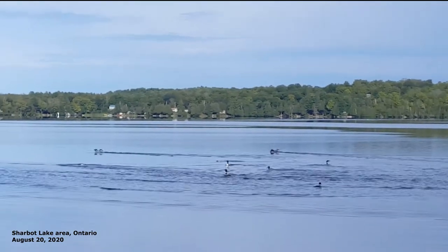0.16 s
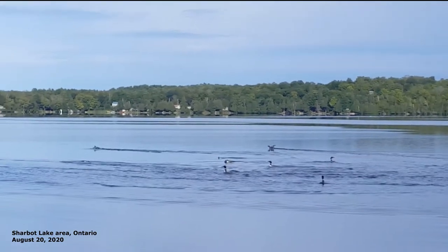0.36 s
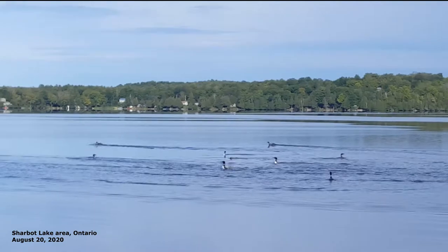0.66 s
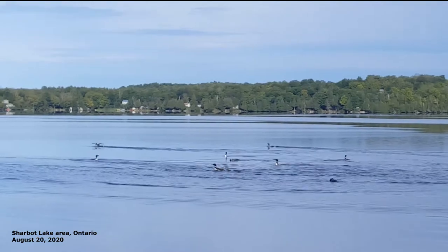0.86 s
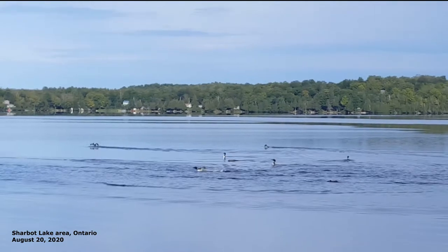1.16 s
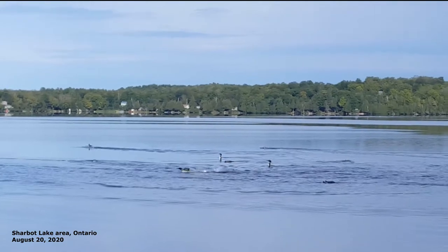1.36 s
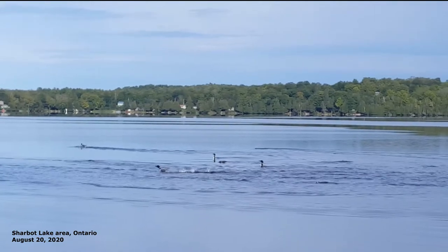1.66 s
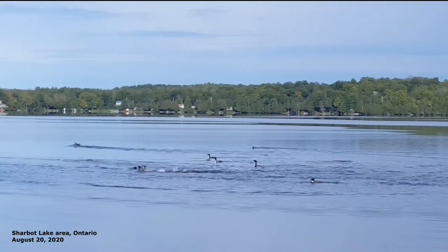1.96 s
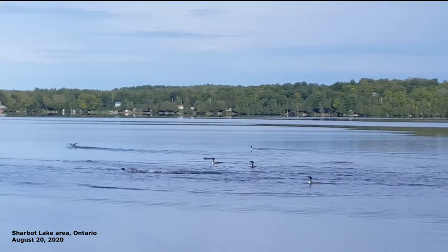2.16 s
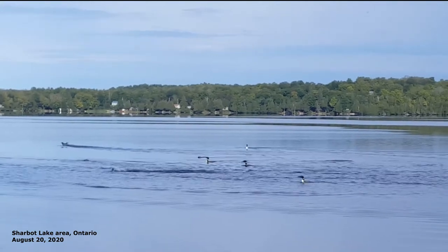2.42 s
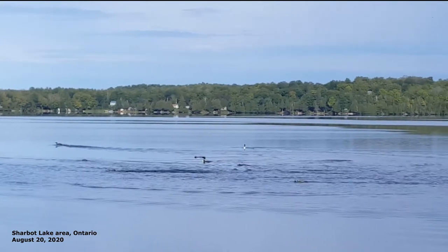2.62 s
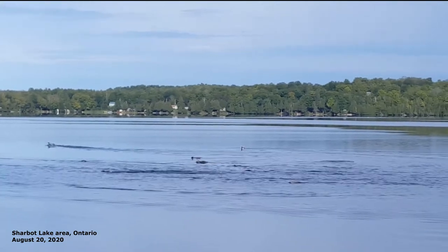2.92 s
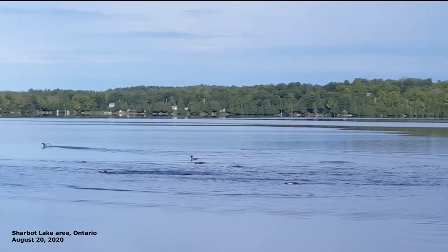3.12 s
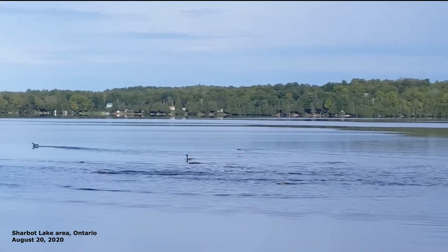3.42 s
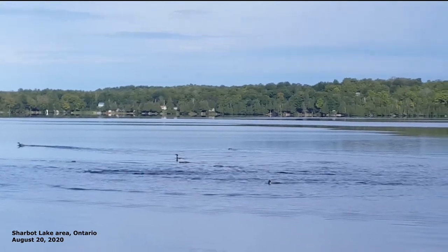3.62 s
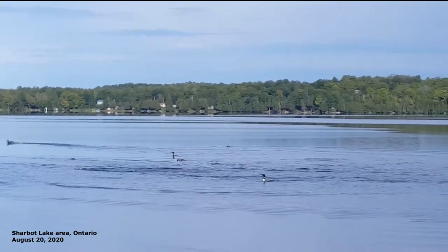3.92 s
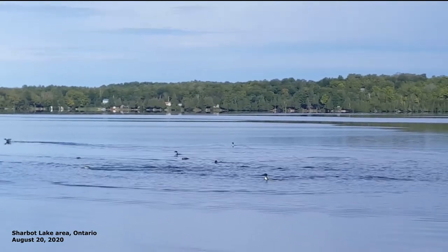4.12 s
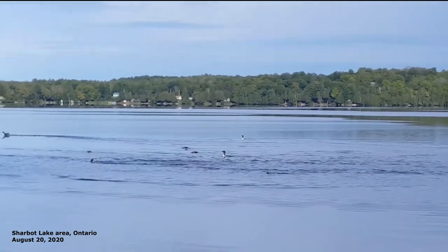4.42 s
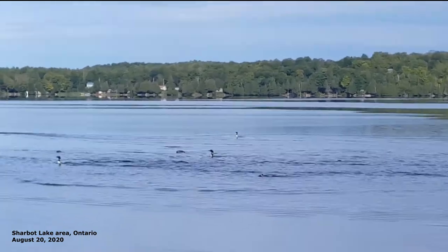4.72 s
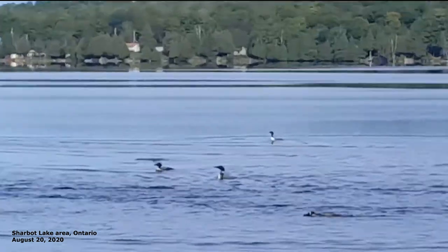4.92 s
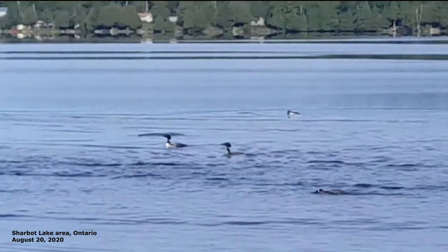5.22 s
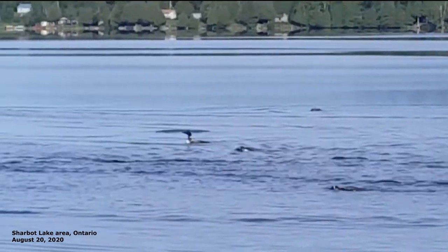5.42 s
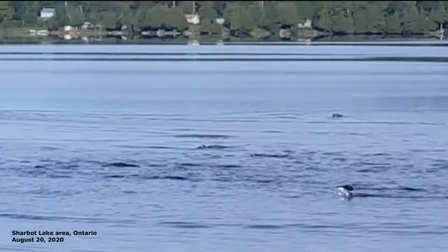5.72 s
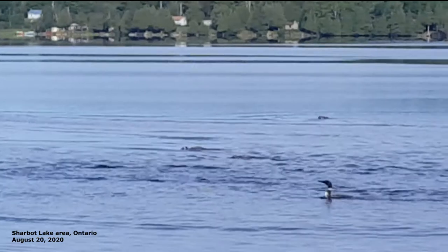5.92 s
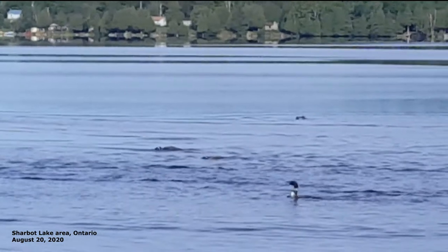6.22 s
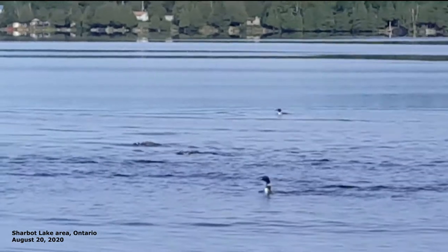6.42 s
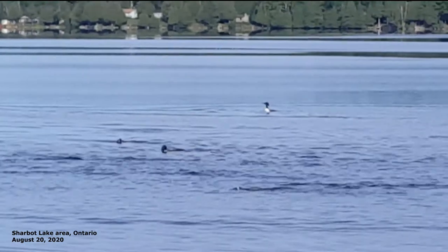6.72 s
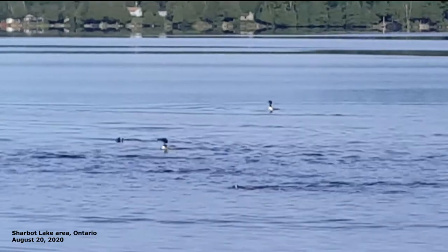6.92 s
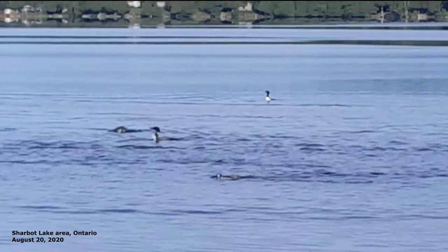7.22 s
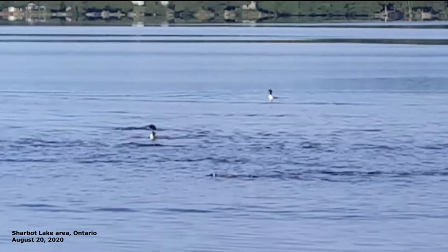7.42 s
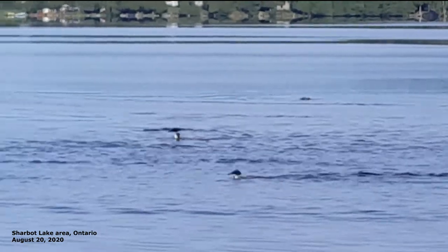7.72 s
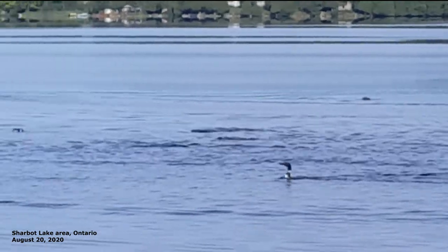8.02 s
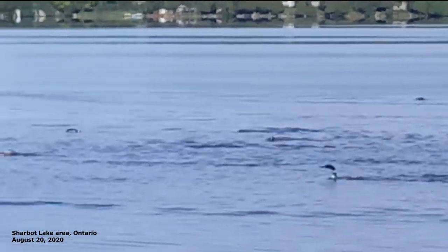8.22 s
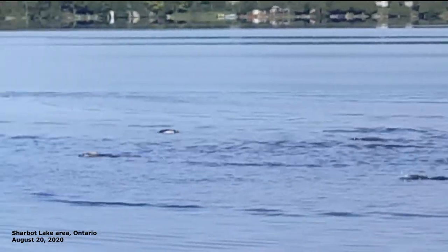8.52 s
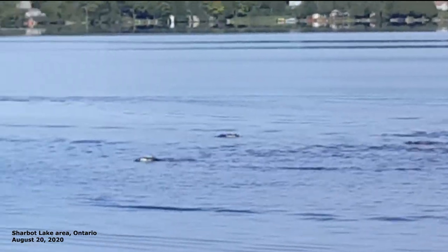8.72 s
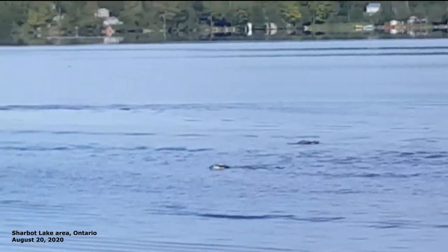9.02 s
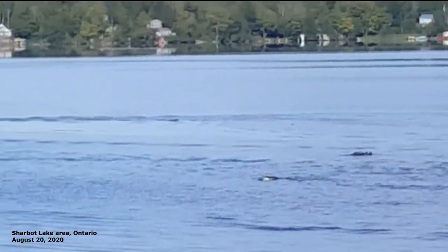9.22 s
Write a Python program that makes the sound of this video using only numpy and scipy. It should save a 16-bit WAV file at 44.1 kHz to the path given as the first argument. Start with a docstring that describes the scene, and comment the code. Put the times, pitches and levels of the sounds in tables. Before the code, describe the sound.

Outdoor stereo pickup beside a lake: loud, clear loon tremolos slightly left of centre, each a rapid yodelling flutter under a second long, crowd together and answer one another, with small yelps and hoots filling the gaps. Diffuse echoes trail behind. Beneath are quiet air and hiss, soft ripples, bubble-like plops, a thin insect buzz at left and a low sinking motor hum. Brief handling crackle occurs before the midpoint.

```python
"""Several diving waterbirds give overlapping tremolo calls on a calm lake: gliding whistles with
a few overtones and breath hiss. The wooded shore answers with scattered, decaying noise echoes.
An insect buzzes to the left as pulsed, ringing noise; a far engine drones past as a few sinking sines.
Water laps as swelling noise and plops as short rising sines. Something rubs and ticks against the left
microphone port as gritty noise and brief snaps, all over a steady bed of lake air and hiss."""
import sys
import numpy as np
from scipy import signal
from scipy.fft import rfft, irfft, next_fast_len
from scipy.io import wavfile
from scipy.ndimage import uniform_filter1d, map_coordinates

SR = 44100
rng = np.random.default_rng(int(sys.argv[2]) if len(sys.argv) > 2 else 0)


def linear_from_db(decibels):
    """Turn decibels (scalar or array-like) into linear amplitude factors; 0 gives 1."""
    return 10 ** (np.asarray(decibels, float) / 20)


def bounce(signal):
    """Save signal as a 16-bit WAV file at the path given by the first command-line argument."""
    frames = np.transpose(np.atleast_2d(signal))
    limited = np.clip(frames, -1, 1)
    pcm = np.round(limited * 32767).astype(np.int16)
    wavfile.write(sys.argv[1], SR, pcm)


N = 412769  # samples


def unit(x):
    """Scale to rms 1."""
    return x / np.sqrt(np.mean(x ** 2) + 1e-20)


def along(points, hz):
    """Read (Hz, value) points on a log frequency axis."""
    point_hz, values = np.transpose(points)
    return np.interp(np.log(hz + 1), np.log(point_hz + 1), values)


def curves(rows):
    """One value per sample for each column after the time."""
    seconds, *columns = np.transpose(rows)
    return [np.interp(np.arange(N) / SR, seconds, column) for column in columns]


def wobble(rate):
    """A smooth random curve with rate knots a second."""
    knots = rng.standard_normal(int(N * rate / SR) + 4)
    return map_coordinates(knots, [np.arange(N) * rate / SR])


def filtered(x, response):
    """Multiply the spectrum of x by a response of frequency."""
    size = next_fast_len(N + SR // 2)
    return irfft(rfft(x, size) * response(np.fft.rfftfreq(size, 1 / SR)), size)[..., :N]


def add(track, start, sound):
    """Mix a sound into a track from the start time in seconds."""
    part = track[round(start * SR):][:len(sound)]
    part += sound[:len(part)]


# Stereo likeness of the noises. Each row: frequency in Hz, left-right correlation (0-1).
STEREO_LIKENESS = [(40, 0.98), (300, 0.8), (700, 0.64), (1600, 0.22), (15000, 0)]
# Stereo balance of the noises. Each row: frequency in Hz, left over right in dB.
STEREO_LEAN = [(60, 1.5), (640, 2.5), (3100, 5), (6000, 8.5), (15000, -2)]


def pair(spectrum):
    """Stereo noise of rms 1: mid and side shares set the likeness, then a tilt per frequency pans it."""
    def mid_and_side(hz):
        angle = np.arccos(np.clip(along(STEREO_LIKENESS, hz), -1, 1)) / 2
        return linear_from_db(along(spectrum, hz)) * [np.cos(angle), np.sin(angle)]

    def balance(hz):
        return linear_from_db(along(STEREO_LEAN, hz) * [[.5], [-.5]])

    mid, side = filtered(rng.standard_normal((2, N)), mid_and_side)
    return unit(filtered(np.array([mid + side, mid - side]), balance))


# Upper overtones. Each row: multiple of the pitch, level in dB added to the flash level of the crest.
UPPER_OVERTONES = [(3, -7.5), (4, -6), (5, -12.5), (6, -16.5), (7, -25.5), (8, -40.5)]
CHEST_THIRD_DB = -21  # third harmonic of the lowest notes, relative to their octave
OCTAVE_DIPS = .5  # extra dB that the head-voice octave loses per dB of dip


def phrase(start, end, octave_db, rows):
    """A whistle that swings between round crests and sharper troughs (s, Hz, dB), heard from start to end."""
    seconds, hz, db = np.transpose(rows)
    t = start + np.arange(int((end - start) * SR)) / SR
    place = np.interp(t, seconds, np.arange(len(seconds)))
    last_leg = len(seconds) - 2
    leg = np.minimum(place.astype(int), last_leg)
    turn = np.pi * (place - leg)
    middle_or_last = np.where(leg == last_leg, 1 - np.cos(turn / 2), (1 - np.cos(turn)) / 2)
    ease = np.where(leg == 0, np.sin(turn / 2), middle_or_last)
    # the power rounds the crests and sharpens the troughs
    rising = np.diff(hz)[leg] > 0
    ease = np.where(rising, 1 - np.abs(1 - ease) ** 1.25, ease ** 1.25)
    pitch, level = (v[leg] + np.diff(v)[leg] * ease for v in (hz, db))
    phase = 2 * np.pi * (np.cumsum(pitch) / SR + rng.random())
    dip_db = level - db.max()

    head_db = min(octave_db, -20 if hz[1:3].max() < 1020 else -8)  # the head voice is nearly pure
    flash_db = min(head_db, -24) + 1.3 * dip_db  # upper overtones flash on the loud crests
    chest = np.clip((1010 - pitch) / 90, 0, 1)  # 1 = low voice, which takes the octave level as listed
    octave_level = chest * octave_db + (1 - chest) * (head_db + OCTAVE_DIPS * dip_db)
    tone = np.sin(phase) + linear_from_db(octave_level) * np.sin(2 * phase)
    tone += (hz[1] < 830) * chest * linear_from_db(octave_db + CHEST_THIRD_DB) * np.sin(3 * phase)
    tone += sum(linear_from_db(flash_db + under) * np.sin(k * phase) for k, under in UPPER_OVERTONES)
    edges = np.clip(np.minimum(t - start, end - t) / .017, 0, 1)  # 17 ms fades
    return np.sqrt(2) * linear_from_db(level) * edges * tone


WAVER_PER_S = 11  # usual crests a second
DRAWN_OUT = .4  # a slow first rise or last fall reaches lower: power of its length
HELD_AFTER = 1.6  # the last fall lasts at most this many half wavers, then the low pitch is held
# Trough pitch. Each row: crest pitch in Hz, share of the pitch lost in a trough of usual depth (0-1).
TROUGH_PITCH_DROP = [(1050, 0.2272), (1250, 0.2162), (1400, 0.234), (1490, 0.1148)]
# Trough level. Each row: crest pitch in Hz, level lost in a trough of usual depth in dB.
TROUGH_LEVEL_DIP = [(1050, 8.6), (1250, 7.6), (1400, 12), (1490, 17.2)]


def tremolo(start, first, last, end, first_hz, last_hz, first_db, last_db, octave_db, depth=1):
    """Evenly spaced crests with troughs between; pitch and level glide from the first crest to the last."""
    count = max(round((last - first) * WAVER_PER_S), 1)
    half = (last - first) / count / 2
    mean_hz = (first_hz + last_hz) / 2
    s = first + half * np.arange(-1, 2 * count + 3)
    s[0] = min(s[0], 0)
    s[-2] = last + np.clip(end - last, half, HELD_AFTER * half)
    s[-1] = max(s[-2], end) + half
    trough = 1. - np.arange(len(s)) % 2  # 0 at a crest, 1 in a trough
    trough[0], trough[-2:] = (np.array([first - s[0], s[-2] - last]) / half) ** DRAWN_OUT
    crest_hz = np.interp(s, [first, last], [first_hz, last_hz])
    crest_db = np.interp(s, [first, last], [first_db, last_db])
    hz = crest_hz * (1 - depth * along(TROUGH_PITCH_DROP, mean_hz) * trough)
    db = crest_db - depth * along(TROUGH_LEVEL_DIP, mean_hz) * trough
    return start, start + end, octave_db, np.transpose([start + s, hz, db])


# A note's rise to its crest: length, starting share of the pitch, starting level; then its final level (re crest).
RISE_S, RISE_FROM, RISE_DB, FADE_DB = .04, .84, -6, -3.5
# A long note that leaps up sags first: time after the crest, share of the pitch, level; then its final level.
SAG_S, SAG_TO, SAG_DB, LEAP_DB = 0.034, .92, -3.5, 7


def note(crest, end, hz, db, end_hz, octave_db):
    """One rise to a crest, then a glide to the end pitch, by way of a sag if it leaps."""
    leaps = end - crest > .055 and end_hz > hz
    sag = [(crest + SAG_S, SAG_TO * hz, db + SAG_DB)] if leaps else []
    start = crest - RISE_S
    end_db = db + (LEAP_DB if leaps else FADE_DB)
    rows = [(start, RISE_FROM * hz, db + RISE_DB), (crest, hz, db), *sag, (end, end_hz, end_db)]
    return start, end, octave_db, rows


# Tremolo calls. Each row: start in seconds, then first crest, last crest and end in seconds after the start,
# first and last crest pitch in Hz, first and last crest level in dB before panning, octave overtone in dB
# re the fundamental (capped in the head voice), depth of the waver as a share of the usual (1 if left out).
TREMOLO_CALLS = [(.212, 0.061, .33, 0.3, 1400, 1381, -30.5, -26, -28, .9),
                 (.5, 0.058, .152, 0.19, 1216, 1280, -24.5, -20.5, -33.5),
                 (0.704, 0.044, .142, .17, 1500, 1483, -21.5, -19.5, -51),
                 (.738, -.018, .15, 0.15, 1096, 1100, -21.5, -19.5, -16),
                 (.878, -0.0028, .154, .24, 1270, 1245, -26, -22.5, -28.5),
                 (1.083, 0.033, .293, 0.33, 1489, 1480, -18.5, -21.5, -53.5),
                 (1.14, -.01, .27, 0.35, 1397, 1286, -37, -40.5, -29.5),
                 (1.704, 0.094, .26, 0.3, 1391, 1403, -31.5, -29.5, -28.5),
                 (1.721, 0.047, .13, 0.14, 1252, 1245, -37.5, -29, -26),
                 (1.835, 0.048, .125, 0.17, 1084, 1114, -22.5, -24, -22),
                 (2.085, 0.046, .24, 0.28, 1335, 1317, -20.5, -23, -26.5),
                 (2.23, 0.019, .475, 0.46, 1420, 1383, -32, -36.5, -24),
                 (2.74, -0.014, .167, 0.23, 1147, 1132, -24, -25.5, -22),
                 (3.071, 0.026, .22, .22, 1264, 1315, -31, -28.5, -50, .75),
                 (3.271, 0.027, .12, 0.17, 1500, 1444, -34, -34, -51),
                 (3.405, -0.018, .527, .65, 1420, 1388, -27.5, -38, -30, .9),
                 (4.349, 0.011, .305, 0.31, 1270, 1293, -30.5, -26, -36, .7),
                 (4.641, -0.024, .36, 0.38, 1250, 1173, -28.5, -27.5, -28),
                 (4.762, 0.042, .316, 0.35, 1127, 970, -21, -27, -19, .85),
                 (4.829, 0.039, .115, 0.13, 1398, 1377, -31.5, -35, -28, .5),
                 (5.014, 0.033, .12, 0.15, 1333, 1275, -36, -39.5, -17),
                 (6.02, 0.037, .129, 0.2, 1470, 1462, -28, -28, -35, .6),
                 (6.07, .04, .412, .44, 1400, 1280, -39.5, -35.5, -17),
                 (6.51, -0.0038, .186, 0.22, 1164, 1127, -19, -21, -9, .95),
                 (7.044, .011, .291, 0.32, 1242, 1307, -25.5, -25, -29, 1.2),
                 (7.165, -0.019, .166, 0.23, 1210, 1137, -24.5, -31, -32),
                 (7.374, 0.055, .145, .2, 1300, 1290, -27.5, -28.5, -30),
                 (7.584, 0.00032, .185, 0.24, 1100, 1039, -23, -25, -21.5),
                 (7.593, 0.039, .14, 0.21, 1490, 1466, -30, -31, -32),
                 (7.85, .015, .208, 0.25, 1423, 1268, -37, -49, -32),
                 (8.301, 0.053, .414, .495, 1252, 1210, -26, -26.5, -30),
                 (8.84, -.008, .285, .34, 1270, 1275, -30, -30, -50, .6),
                 (9.05, 0.026, .175, 0.23, 1401, 1439, -32, -34, -39, .45),
                 (9.225, 0.018, .135, 0.14, 1289, 1230, -31.5, -24, -37)]
# Single notes. Each row: crest in seconds, end in seconds, crest pitch in Hz, crest level in dB before
# panning, end pitch in Hz, octave overtone in dB re the fundamental (capped in the head voice).
SINGLE_NOTES = [(0.048, 0.121, 1318, -38, 1060, -30), (.435, .48, 1330, -31, 1200, -32),
                (0.102, 0.142, 882, -35, 815, -10.5), (0.181, 0.227, 977, -34, 997, -1.5),
                (0.254, 0.336, 816, -44, 1047, -4.5), (0.347, 0.39, 1480, -35.5, 1320, -30),
                (.46, 0.501, 770, -43.5, 840, 10), (0.726, 0.751, 799, -40, 833, 7.5),
                (0.894, 0.912, 711, -42, 830, 11), (1.056, 1.076, 685, -37, 850, 8.5),
                (1.693, 1.737, 937, -34, 890, -11.5), (1.803, 1.846, 730, -37.5, 685, 3.5),
                (1.945, 1.98, 866, -39.5, 710, 1.5), (2.037, 2.072, 903, -31.5, 746, 1.5),
                (2.059, 2.087, 1320, -27, 1190, -19), (2.145, 2.176, 1007, -25, 870, -21),
                (2.729, 2.749, 752, -42.5, 895, 9.5), (2.992, 3.08, 863, -39.5, 930, -6),
                (3.515, 3.575, 1200, -36, 990, -30), (3.011, 3.074, 1320, -39, 1070, -18),
                (3.302, 3.402, 909, -39, 1250, -8.5), (3.496, 3.537, 895, -41.5, 834, -2),
                (4.27, 4.361, 815, -45, 1006, -4), (4.609, 4.657, 860, -43.5, 800, 2),
                (4.69, 4.737, 920, -39, 950, 3), (4.722, 4.776, 743, -39, 787, 7.5),
                (5.866, 5.926, 877, -35.5, 810, -3.5), (5.955, 6.016, 1256, -26.5, 1070, -35),
                (6.11, 6.157, 920, -37.5, 890, -3), (6.17, 6.195, 960, -42, 930, -12),
                (6.26, 6.33, 1251, -32, 1065, -29), (6.35, 6.408, 1040, -37, 973, -24),
                (6.419, 6.514, 748, -38.5, 928, 9), (6.971, 6.999, 814, -42.5, 740, 5),
                (7.051, 7.112, 863, -39.5, 690, 0), (7.347, 7.44, 850, -38.5, 990, -5),
                (7.505, 7.595, 707, -39, 872, 5.5), (7.555, 7.63, 1270, -31, 1020, -36),
                (7.845, 7.925, 1219, -36, 1060, -37), (7.872, 7.907, 639, -37.5, 623, -4),
                (8.189, 8.229, 848, -35.5, 765, -2.5), (8.257, 8.261, 1250, -32.5, 1240, -26),
                (8.278, 8.317, 881, -32.5, 817, -4), (8.825, 8.853, 870, -37.5, 990, -7),
                (8.987, 9.026, 909, -42.5, 816, -2.5), (9.297, 9.358, 851, -34, 954, -7),
                (.945, 0.983, 700, -42, 640, 8.5), (1.645, 1.656, 910, -38, 970, -14),
                (1.661, 1.697, 743, -52, 670, 11.5), (2.205, 2.218, 901, -33, 940, -10),
                (0.528, 0.606, 1340, -35, 1166, -30)]
# Drift of the flock toward the centre. Each row: time in seconds, half of left over right in dB.
FLOCK_DRIFT = [(0, 2.5), (4, 1.43), (9.36, 0.9)]
# Rattle in the voices. One row: start in seconds, end in seconds, rattle rate in Hz, depth (0-1).
VOICE_RATTLE = (8.33, 8.57, 275, 0.3)
# Breath hiss colour. Each row: frequency in Hz, relative density in dB per Hz.
BREATH_COLOUR = [(1800, -10.5), (3000, -12.5), (5000, -0.5), (9000, -21)]


def birds():
    """Each phrase comes from its own spot ahead and left, with breath hiss; moving air makes it flutter."""
    left, right = np.zeros(N), np.zeros(N)
    phrases = [tremolo(*row) for row in TREMOLO_CALLS] + [note(*row) for row in SINGLE_NOTES]
    spots = rng.standard_normal((len(phrases), 2))
    for plan, (lean, lag) in zip(phrases, spots):
        start = plan[0]
        call = phrase(*plan)
        lean_db = np.interp(start, *np.transpose(FLOCK_DRIFT)) + 0.2 * lean
        right_delay_s = abs(.00013 + .00004 * lag)
        add(left, start, linear_from_db(lean_db) * call)
        add(right, start + right_delay_s, linear_from_db(-lean_db) * call)
    voices = np.array([left, right])
    t = np.arange(N) / SR
    start, end, rattle_hz, depth = VOICE_RATTLE
    voices *= 1 + depth * (t > start) * (t < end) * np.cos(2 * np.pi * rattle_hz * t)
    effort = uniform_filter1d(np.abs(voices), 1800)  # mean loudness over 41 ms
    breath = linear_from_db(-36.5) * effort * pair(BREATH_COLOUR)
    flutter = linear_from_db(1.8 * wobble(70))
    return (voices + breath) * flutter


# Decay of the shore's answer. Each row: frequency in Hz, time to fall by 60 dB in seconds.
SHORE_DECAY = [(600, .9), (1400, 1.0), (3000, .6), (8000, .3)]


def shore(calls):
    """Scattered echoes from water and trees, in uneven clumps; each frequency dies at its own speed."""
    hz, t, bins = signal.stft(rng.standard_normal((2, SR)), SR, nperseg=256)
    clumps_db = 3.5 * rng.standard_normal(len(t))
    decay_db = -60 * t / along(SHORE_DECAY, hz)[:, None]
    tail = signal.istft(bins * linear_from_db(clumps_db + decay_db), SR, nperseg=256)[1]
    tail = .3 * tail[0] + .8 * tail  # the two sides share some of their echoes
    shimmer = linear_from_db(2 * wobble(60))  # moving air blurs the echoes
    late = np.pad(calls * shimmer, ((0, 0), (round(.02 * SR), 0)))  # answers start 20 ms late
    return linear_from_db(-18.5) * signal.fftconvolve(late, tail / np.linalg.norm(tail[0]), axes=1)[:, :N]


def insect():
    """Wing strokes about 68 times a second, each of three rasps, ring near 5.5 kHz."""
    phase = 2 * np.pi * np.cumsum(67.8 + .25 * wobble(1.5)) / SR
    strokes = linear_from_db(5.5 * np.cos(phase) + 4 * np.cos(3 * phase) + wobble(3))
    rasp = strokes * rng.standard_normal(N)

    def ring(hz):
        width = 1j * hz * 650  # 650 Hz wide resonance, passed twice
        return (width / (5500 ** 2 - hz * hz + width)) ** 2

    return linear_from_db([[-57], [-70]]) * unit(filtered(rasp, ring))


# Passing engine. Each row: time in seconds, firing pitch in Hz before its waver,
# level in dB to which each order adds its own.
ENGINE_PASS = [(0, 156.2, -55.5), (2.5, 151.6, -54.5), (4.5, 144.7, -55.5), (6, 133.8, -57),
               (7, 128, -81.5), (9.36, 120, -71)]


def engine():
    """A far engine: its firing tone sinks as it passes and wavers in the air."""
    hz, db = curves(ENGINE_PASS)
    phase = 2 * np.pi * np.cumsum(hz * (1 + .006 * wobble(8))) / SR
    orders = [(.5, -25.5), (1, -5.0), (1.5, -13), (2, -19)]  # (multiple, dB)
    drone = sum(linear_from_db(db + level + 3.5 * wobble(7)) * np.sin(k * phase) for k, level in orders)
    return np.sqrt(2) * drone * linear_from_db([[1.1], [-1.1]])


# Swells of the lapping. Each row: time in seconds, level in dB before the random swell.
LAP_SWELLS = [(0, -51), (2, -49.5), (4, -57), (5.5, -61.5), (7, -53.5), (9.36, -53)]
# Nearer plops. Each row: time in seconds (10 ms after the onset), level in dB before envelope and panning,
# starting pitch in Hz.
NEAR_PLOPS = [(.5, -49, 398), (1.31, -47, 399), (1.455, -44, 480), (1.47, -42.5, 214), (1.49, -43, 520),
              (1.76, -42.5, 280), (2.23, -34.5, 570), (2.39, -36, 693), (3.98, -49, 560), (4.05, -47, 609),
              (4.12, -64, 704), (4.6, -43.5, 437), (5.07, -45, 600), (6.52, -44.5, 409), (9.27, -45.5, 396)]


def water():
    """Ripples lap in uneven swells; trapped bubbles plop with rising pitch."""
    lap_colour = [(150, -31.5), (300, -8.5), (700, -2.5), (2500, -10.5), (7000, -39.5)]  # (Hz, dB per Hz)
    lap = linear_from_db(curves(LAP_SWELLS)[0] + wobble(4.1)) * pair(lap_colour)
    plops, t = np.zeros(N), np.arange(SR // 10) / SR
    # many fainter ones at random times, levels and pitches
    far_plops = rng.random((60, 3)) * [N / SR - .1, 7, 450] + [.02, -58, 300]
    for s, db, hz in [*NEAR_PLOPS, *far_plops]:
        envelope = linear_from_db(db - 60 * t / 0.13) * (1 - np.exp(-t / 0.004))
        add(plops, s - .01, envelope * np.sin(2 * np.pi * hz * t * (1 + 1.5 * t)))
    return lap + plops * linear_from_db([[1.2], [-1.2]])


# Strokes of rubbing, one list each. Each row: time in seconds, level in dB before panning.
RUB_STROKES = [
    [(3.62, -52.5), (3.64, -34), (3.7, -37), (3.75, -40.5), (3.78, -48.5)],
    [(5.805, -50), (5.815, -48), (5.83, -56), (5.845, -51.5), (5.852, -42.5), (5.862, -71.5)],
]
# Colour of contact noise at the port. Each row: frequency in Hz, relative density in dB per Hz.
PORT_COLOUR = [(1060, -24), (1800, -10.5), (2300, -10), (4000, -17.5), (5690, 1), (8790, -24), (12700, -30),
               (15700, -49)]
# Ticks. Each row: time in seconds (0.4 ms after the onset), level in dB before envelope and panning,
# pitch in Hz.
PORT_TICKS = [(3.655, 10, 5650), (3.902, 5.5, 2580), (5.374, -54.5, 3900), (5.844, -41, 5050)]


def contact():
    """Gritty rubbing and short ticks at the left port, faint at the right."""
    gain, ticks, t = np.zeros(N), np.zeros(N), np.arange(SR // 100) / SR
    for rows in RUB_STROKES:
        s, db = np.transpose(rows)
        stroke_t = np.arange(s[0], s[-1], 1 / SR)
        add(gain, s[0], linear_from_db(np.interp(stroke_t, s, db)))
    grit = linear_from_db(1.4 * wobble(500)) * rng.standard_normal((2, N))
    rub = gain * unit(filtered(grit, lambda hz: linear_from_db(along(PORT_COLOUR, hz))))
    for s, db, hz in PORT_TICKS:
        snap = np.sin(2 * np.pi * hz * t) + 0.17 * rng.standard_normal(len(t))
        envelope = linear_from_db(db - 60 * t / 0.0011) * (1 - np.exp(-t / 0.00046))
        add(ticks, s - .0004, envelope * snap)
    return rub * linear_from_db([[6], [-16]]) + ticks * linear_from_db([[3], [-12]])


# Colour of lake air and microphone hiss. Each row: frequency in Hz, relative density in dB per Hz.
AIR_COLOUR = [(18, -34.5), (30, -16), (49, -3), (141, 0), (220, -5.5), (352, -16.5), (610, -13.5),
              (1270, -15), (3920, -42.5), (5510, -15.5), (7740, -34), (15700, -36)]


def lake_air():
    """Lake air and microphone hiss: coloured stereo noise that swells slightly."""
    swell_db = 1.3 * wobble(4.4)
    return linear_from_db(-55 + swell_db) * pair(AIR_COLOUR)


def scene():
    """Birds with their echoes over the lake's background."""
    calls = birds()
    return calls + shore(calls) + insect() + engine() + water() + contact() + lake_air()


def top_cut(x):
    """Nothing passes above the cut-off."""
    return signal.sosfilt(signal.butter(12, 16800, fs=SR, output="sos"), x)


def record(dry):
    """The microphones lose the deep bass below about 60 Hz and all treble from 15.77 kHz."""
    mix = filtered(dry, lambda hz: (hz < 15770) / np.sqrt(1 + (60 / (hz + 1)) ** 2))
    return top_cut(mix)


dry = scene()
out = record(dry)
bounce(out)
```